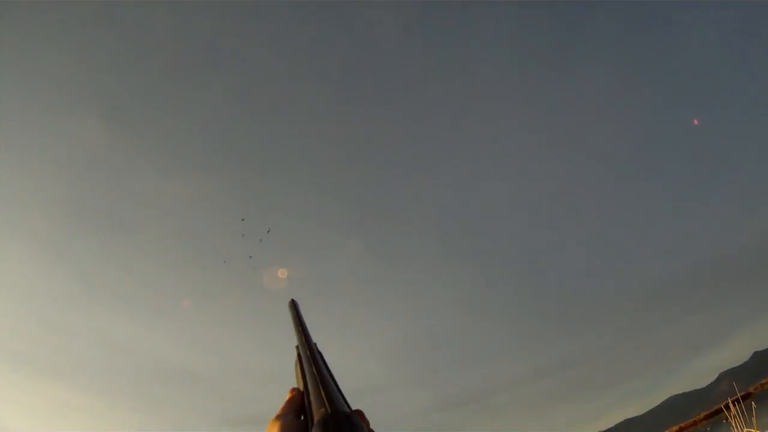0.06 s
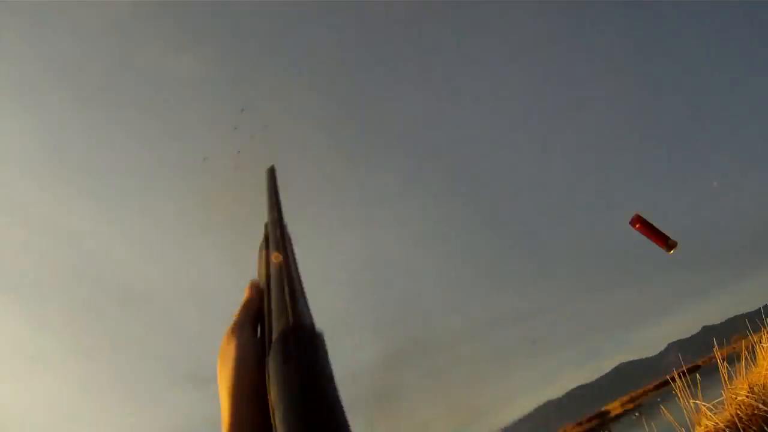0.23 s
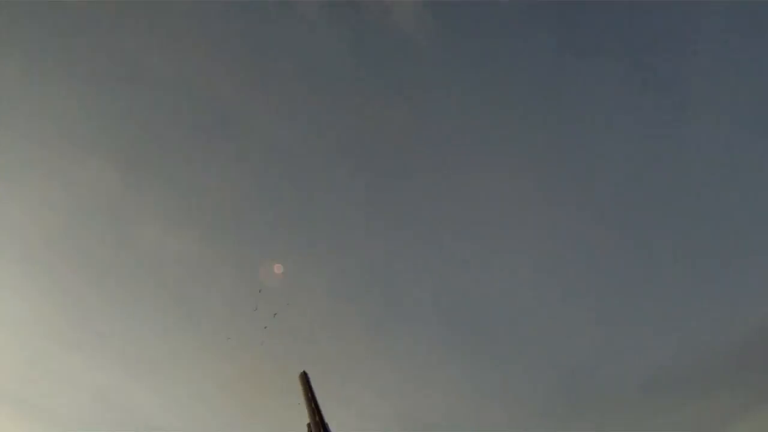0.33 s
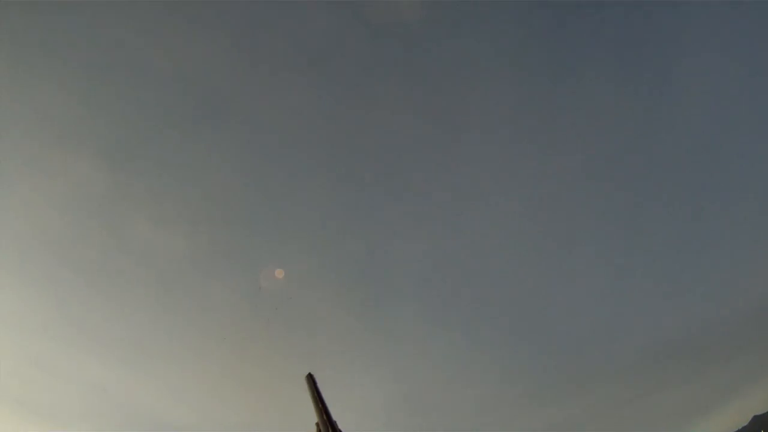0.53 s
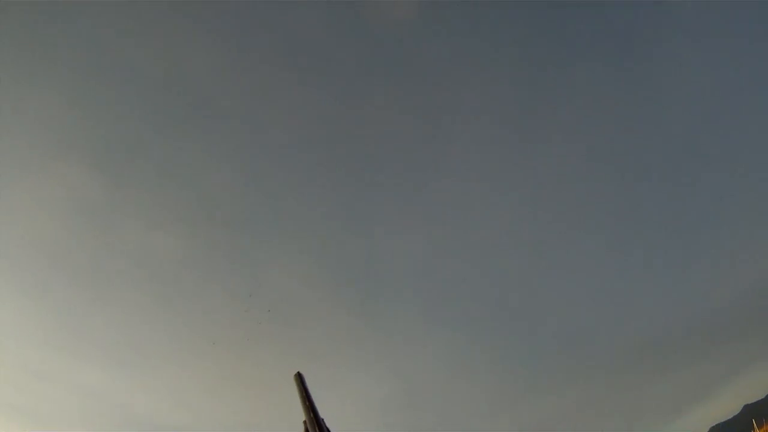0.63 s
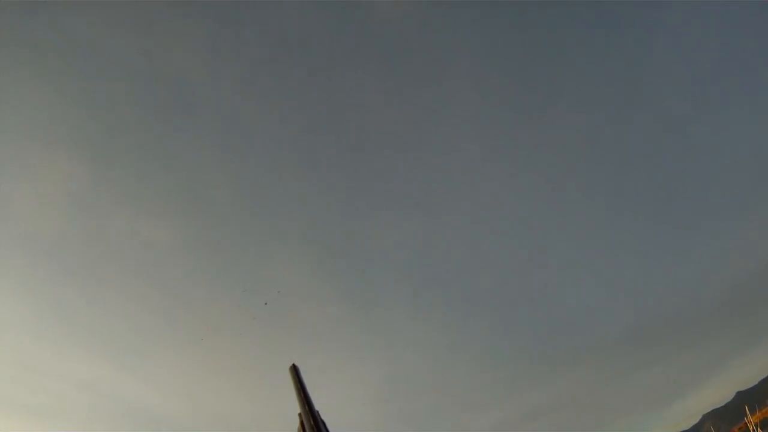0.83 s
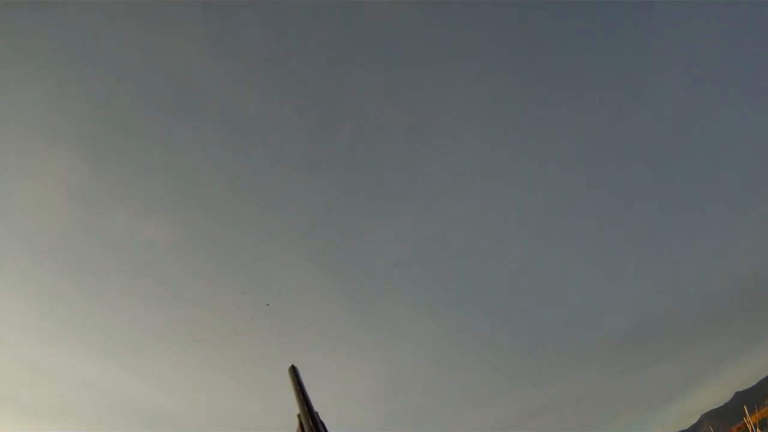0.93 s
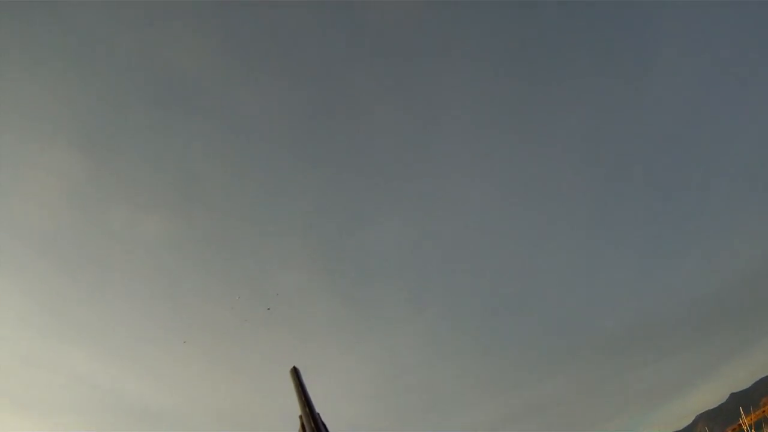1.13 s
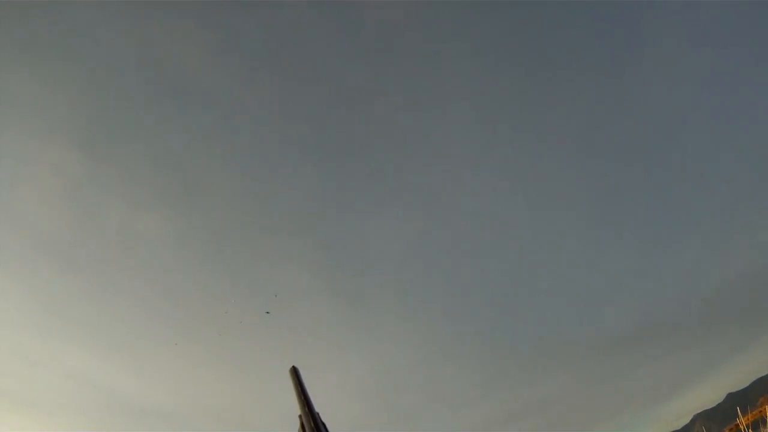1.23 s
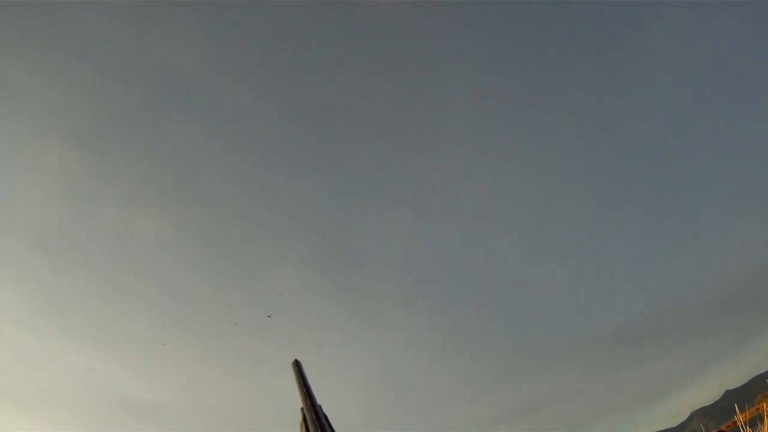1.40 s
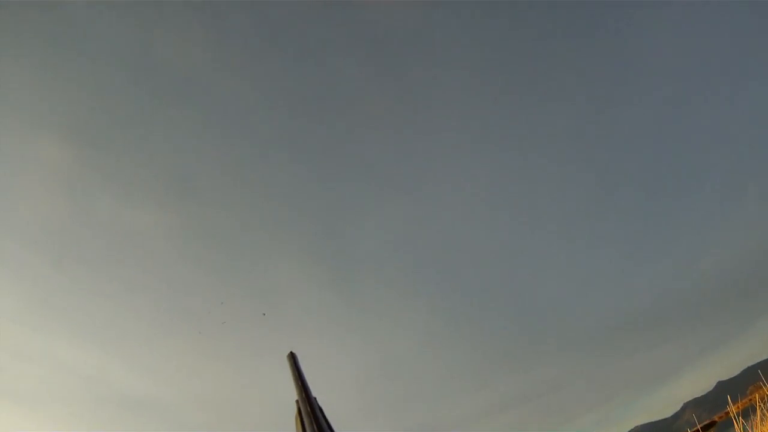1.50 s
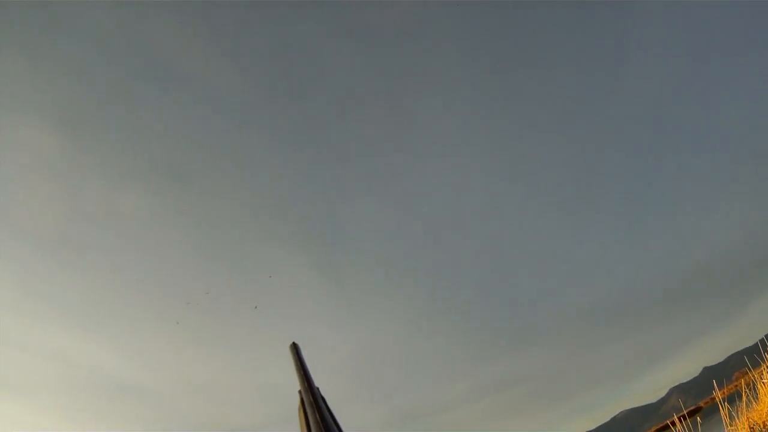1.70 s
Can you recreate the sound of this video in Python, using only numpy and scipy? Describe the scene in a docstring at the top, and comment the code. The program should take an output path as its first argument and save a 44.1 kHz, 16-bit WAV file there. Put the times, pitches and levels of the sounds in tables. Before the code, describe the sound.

A single loud shotgun shot outdoors, with a quick bolt clack and fading echo.

```python
"""Light wind hisses in dry marsh grass, then one shotgun shot goes off and echoes over the open land.
We hear it from a camera in a plastic housing, worn by the shooter. The blast makes the housing ring
and briefly overloads the microphone. The gun's kick rocks the camera while the bolt slides and
clacks shut, and the hills send back a few dull echoes."""
import sys
import numpy as np
from scipy.fft import rfft, irfft, next_fast_len
from scipy.io import wavfile
from scipy.ndimage import map_coordinates

SR = 44100
rng = np.random.default_rng(int(sys.argv[2]) if len(sys.argv) > 2 else 0)


def transcribe(u):
    """Save the signal u as a 16-bit wav file named by the first command-line argument.

    u: samples, shape (n,) or (channels, n), limited to [-1, 1]; the rate is SR.
    q: integer samples, one column per channel.
    """
    v = np.clip(np.atleast_2d(u).T, -1, 1)
    q = np.round(v * 32767).astype(np.int16)
    wavfile.write(sys.argv[1], SR, q)


N = 77175
SHOT_S = .2295


def amp(db):
    """Turn decibels into a gain."""
    return 10 ** (np.asarray(db) / 20)


def unit(x):
    """Scale a signal to an average power of 1."""
    return x / np.sqrt(np.mean(x ** 2) + 1e-20)


def since(start):
    """Seconds since the start time, zero before it."""
    return np.maximum(np.arange(N) / SR - start, 0)


def filtered(x, response):
    """Turn each frequency up or down by the gain response(f)."""
    size = next_fast_len(N + 8192)
    return irfft(rfft(x, size) * response(np.fft.rfftfreq(size, 1 / SR)), size)[:N]


def noise(colour):
    """Noise of power 1; its colour says how strong the frequencies are next to each other."""
    f, db = np.transpose(colour)
    white = rng.standard_normal(N)
    return unit(filtered(white, lambda hz: amp(np.interp(np.log(hz + 1), np.log(f), db))))


def envelope(start, rise, hold, fade):
    """A sound's shape in seconds: it rises, holds, then drops 60 dB in each fade time."""
    return np.minimum(since(start) / rise, 1) * np.exp(-np.log(1000) * since(start + rise + hold) / fade)


def burst(colour, start, shape):
    """A puff of noise whose energy depends only on its shape (rise, hold, fade)."""
    outline = envelope(start, *shape)
    return unit(outline * noise(colour)) * np.sqrt(np.mean(outline ** 2))


def wobble(rate):
    """A smooth curve through `rate` random points a second."""
    return map_coordinates(rng.standard_normal(int(N * rate / SR) + 4), [np.arange(N) * rate / SR])


# colour of the grass, and of the wind on the microphone (f/Hz, level/dB)
GRASS_COLOUR = [(100, -3.5), (300, -5), (750, -6.5), (1300, -2.5), (1600, -5.5), (2000, -2.5), (2800, -0.5),
                (3600, -6), (4600, -11), (7500, -14.5), (14000, -19)]
WIND_COLOUR = [(15, -8), (42, 2.5), (70, -8), (110, -21), (300, -29.5), (700, -41.5), (3000, -61.5)]
# how loud each is over time (t/s, level/dB)
GRASS_LEVEL = [(0, -57.5), (.2, -60), (.75, -64.5), (1.15, -67.5), (1.45, -69), (1.75, -72.5)]
WIND_LEVEL = [(0, -55.5), (.18, -63), (0.699, -60.5), (1.05, -61), (1.4, -63.5), (1.469, -56),
              (1.54, -59.5), (1.67, -53), (1.75, -61)]
# brief rustles (t/s, level/dB)
RUSTLES = [(0.133, -58.5), (0.821, -61), (0.981, -65.5)]
# colour of the steady rush of open country (f/Hz, level/dB)
RUSH_COLOUR = [(40, -4.5), (150, 1), (320, 0.5), (700, -6.5), (1300, -7), (2000, -17), (4000, -27)]


def breeze(flutter_db=0.8, gust_db=1):
    """Dry grass hisses and rustles, wind rumbles on the microphone, and the distance rushes softly."""
    grass_db = np.interp(since(0), *np.transpose(GRASS_LEVEL))
    wind_db = np.interp(since(0), *np.transpose(WIND_LEVEL))
    grass = amp(grass_db + flutter_db * wobble(25)) * noise(GRASS_COLOUR)
    rustles = sum(amp(db) * burst(GRASS_COLOUR, t, (.0018, .012, .1)) for t, db in RUSTLES)
    wind = amp(wind_db + gust_db * wobble(7)) * noise(WIND_COLOUR)
    return grass + rustles + wind + amp(-66.5) * noise(RUSH_COLOUR)


# echoes off nearby ground, and off open land (delay/s, rise/s, hold/s, fade/s, level/dB)
NEAR_ECHOES = [(.011, 0.0018, .005, .07, -28.5), (0.015, .005, 0.0061, 0.32, -38.5)]
LAND_ECHOES = [(.1, 0.06, 0.16, 0.744, -50.5), (0.409, 0.16, 0.21, 2.4, -73.5)]
# echoes off the hills (t/s, level/dB)
HILL_ECHOES = [(.96, -68.5), (1.113, -63), (1.24, -66)]
# colour of each kind of echo (f/Hz, level/dB)
NEAR_COLOUR = [(100, -3.5), (300, -9.5), (600, -11), (1250, -1.5), (2050, 2.5), (3000, 0.5), (4600, -5.5),
               (7500, -9.5), (14000, -15)]
LAND_COLOUR = [(100, -5), (300, -9.5), (600, -8), (1250, -1.5), (1600, -2.5), (2050, 2), (3000, -3.5),
               (4600, -11.5), (7500, -15), (14000, -15)]
HILL_COLOUR = [(150, 4), (600, -3.5), (1200, -4), (2200, -2.5), (4000, -20), (10000, -27)]


def echoes():
    """Ground and grass nearby throw the shot back at once; land and hills answer later and duller."""
    near = sum(amp(db) * burst(NEAR_COLOUR, SHOT_S + delay, shape) for delay, *shape, db in NEAR_ECHOES)
    land = sum(amp(db) * burst(LAND_COLOUR, SHOT_S + delay, shape) for delay, *shape, db in LAND_ECHOES)
    hills = sum(amp(db) * burst(HILL_COLOUR, t, (.022, .025, .23)) for t, db in HILL_ECHOES)
    return near + land + hills


# the bolt sliding (t/s, rise/s, hold/s, fade/s, level/dB)
SLIDES = [(0.316, .024, .03, .12, -41)]
# the bolt clacking (t/s, level/dB)
CLACKS = [(.3412, -41.5), (.375, -35), (.3815, -32)]
# colour of a slide and of a clack (f/Hz, level/dB)
SLIDE_COLOUR = [(100, -4), (300, -11), (600, -15.5), (1150, -4.5), (1500, -6), (1950, 3.5), (2400, -2),
                (3200, -11), (4500, -17.5), (8500, -18), (14000, -21.5)]
CLACK_COLOUR = [(200, -30), (780, -17), (1060, 2), (1200, -0.5), (1500, -11.5), (2100, -11.5), (3000, -20),
                (5400, -19), (10000, -26), (15000, -28)]


def bolt():
    """The bolt, the moving part that throws out the shell, slides and clacks shut."""
    slide = sum(amp(db) * burst(SLIDE_COLOUR, t, shape) for t, *shape, db in SLIDES)
    clacks = sum(amp(db) * burst(CLACK_COLOUR, t, (.001, .0013, .029)) for t, db in CLACKS)
    return slide + clacks


# swings of the camera (t/s, f/Hz, glide/(Hz per s), rise/s, hold/s, fade/s, level/dB)
SWINGS = [(0.232, 100.5, -1400, .005, .006, 0.11, -27), (0.267, 50.35, -10, .01, .01, 0.077, -33.5),
          (0.31, 23.8, 394, 0.027, 0.063, 0.044, -25.5), (0.421, 37.7, 0, .01, 0.029, 0.089, -37)]
# colour of the kick's rumble (f/Hz, level/dB)
RUMBLE_COLOUR = [(20, 0), (60, 7), (110, -8), (170, -14), (290, -15.5), (500, -26), (2000, -61.5)]


def recoil(knock_s=.286, knock_hz=283.6):
    """The gun's kick rocks the camera, with a dull rumble and a hollow knock from the gun's stock."""
    swings = sum(amp(db) * envelope(t, *shape)
                 * np.sin(2 * np.pi * (hz + glide * since(t) / 2) * since(t))
                 for t, hz, glide, *shape, db in SWINGS)
    rough_tone = np.sin(2 * np.pi * knock_hz * since(knock_s) + wobble(118.8))
    knock = amp(-47) * envelope(knock_s, .0079, .016, .088) * rough_tone
    rumble = amp(-43) * burst(RUMBLE_COLOUR, SHOT_S, (.06, .14, .22))
    return swings + knock + rumble


# tones the plastic housing rings at (f/Hz, level/dB, fade/s)
HOUSING_TONES = [(619.5, -11, 0.022), (867, -10, 0.033), (1098, -4, 0.04), (1827.3, -7.5, 0.057),
                 (2212, -8, 0.044), (2380, -15, 0.013), (3060, -11, .03), (4510, -14, 0.017),
                 (6620, -15, 0.055)]
# colour of the low boom and of the bright crack (f/Hz, level/dB)
BOOM_COLOUR = [(40, -12.5), (90, -10.5), (170, -15), (300, -6.5), (650, 0), (1100, -0.5), (1500, -9),
               (3000, -23), (16000, -46.5)]
CRACK_COLOUR = [(200, -20.5), (1000, -7), (1900, 0.5), (2900, -5.5), (4500, -3.5), (7500, -8), (10000, -12),
                (16000, -15.5)]


def blast(boom_shape=(.0036, .005, .0025), push_s=.00013, push_delay_s=.0032):
    """A push of air, a boom and a crack leave the barrel; the housing rings while the boom drives it."""
    t = since(SHOT_S)
    tones = sum(amp(db - 60 * t / fade) * np.sin(2 * np.pi * hz * t) for hz, db, fade in HOUSING_TONES)
    ring = amp(5) * tones * envelope(SHOT_S, *boom_shape)
    age = since(SHOT_S + push_delay_s) / push_s
    push = amp(-7.5) * (age > 0) * (1 - age) * np.exp(-age)  # the air pushes, then sucks back
    boom = amp(-10) * burst(BOOM_COLOUR, SHOT_S, boom_shape)
    crack = amp(-4.5) * burst(CRACK_COLOUR, SHOT_S, (.0051, .004, .016))
    return push + ring + boom + crack


# pitches boosted by the microphone's opening (f/Hz, width/Hz, level/dB)
OPENING_PEAKS = [(1250, 170, 5.5), (1880, 170, 8.5), (2101, 160, 4.5), (3587, 170, 8), (5350, 100, 7.5),
                 (6650, 120, 7), (8460, 220, 8.5), (10033, 340, 10.5), (14066, 340, 9.5)]


def mic_opening(f):
    """Gain at frequency f: the opening rings at a few pitches and lets the rest through."""
    peaks = [1 + (amp(db) - 1) * 1j * f * width / (hz * hz - f * f + 1j * f * width)
             for hz, width, db in OPENING_PEAKS]
    return np.prod(peaks, axis=0)


def scene():
    """The blast plus the quieter sounds, which take on the colour of the microphone's opening."""
    return (blast() + filtered(echoes() + bolt() + recoil() + breeze(), mic_opening))[None]


# pitches the microphone hears poorly (f/Hz, width/Hz, depth/dB)
MIC_DIPS = [(162.1, 19, 1.5), (6010, 310, 17), (12010, 700, 27)]


def record(dry, ceiling=.72, hardness=5, top_hz=15400):
    """The microphone squashes loud peaks, weakens a few pitches and loses the highest treble."""
    squashed = dry[0] / (1 + np.abs(dry[0] / ceiling) ** hardness) ** (1 / hardness)
    dips = lambda f: amp(-sum(db * np.exp(-((f - hz) / width) ** 2) for hz, width, db in MIC_DIPS))
    return filtered(squashed, lambda f: dips(f) * (f < top_hz))[None]


dry = scene()
out = record(dry)
transcribe(out)
```